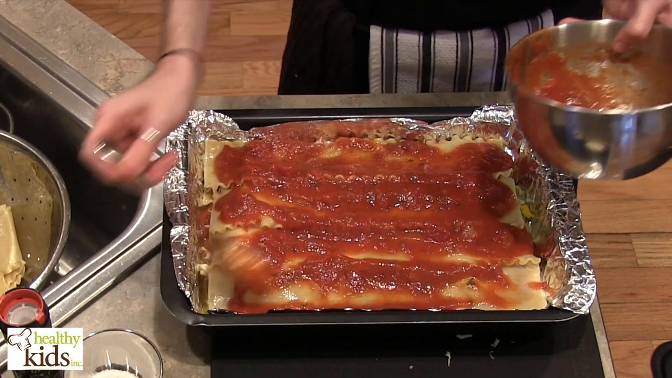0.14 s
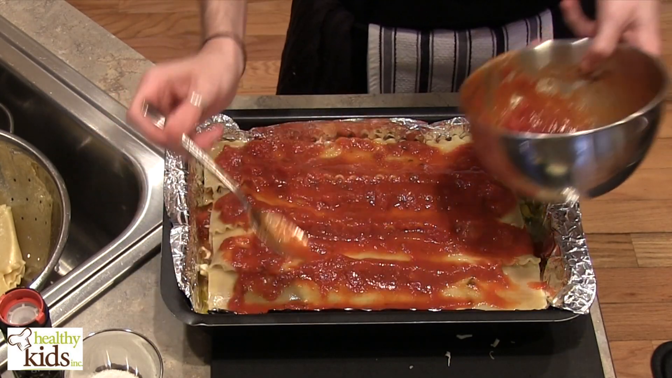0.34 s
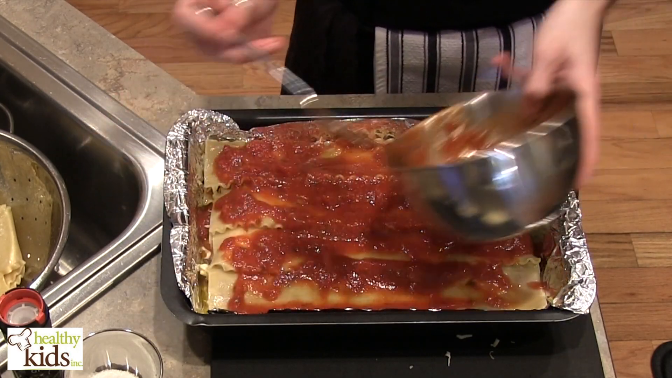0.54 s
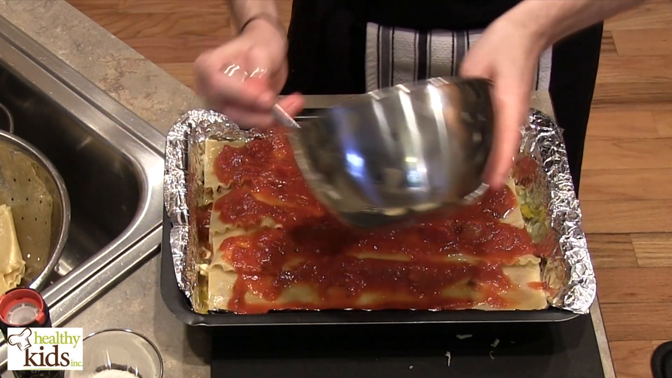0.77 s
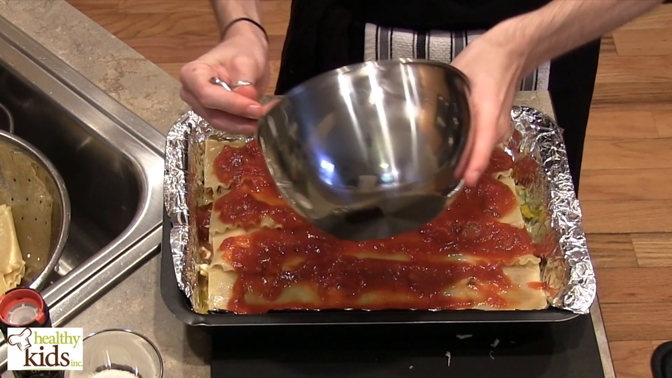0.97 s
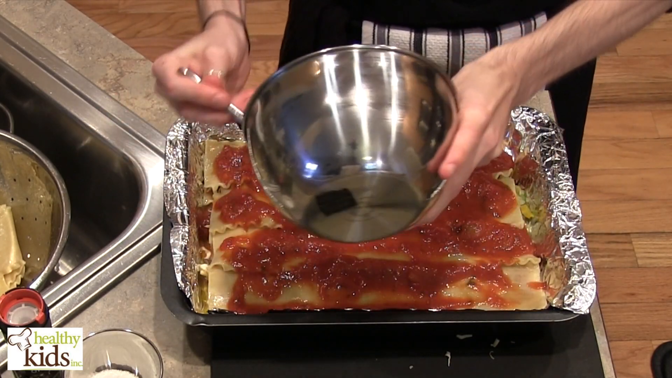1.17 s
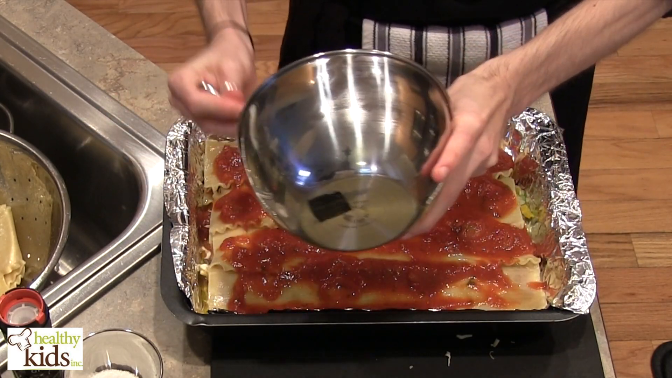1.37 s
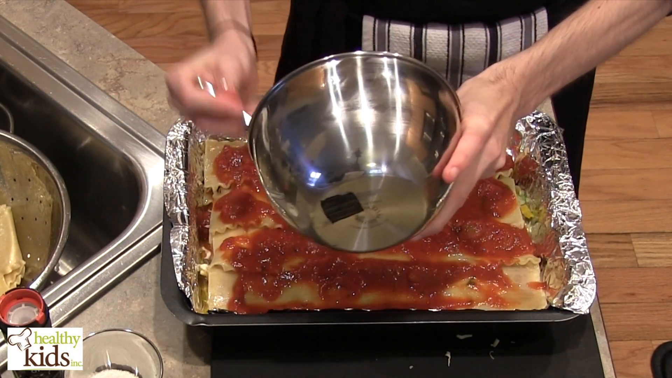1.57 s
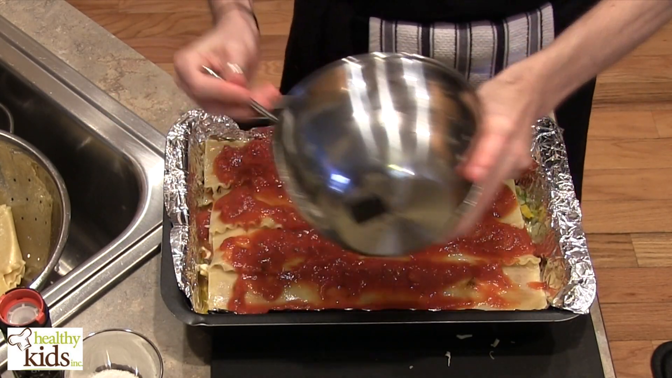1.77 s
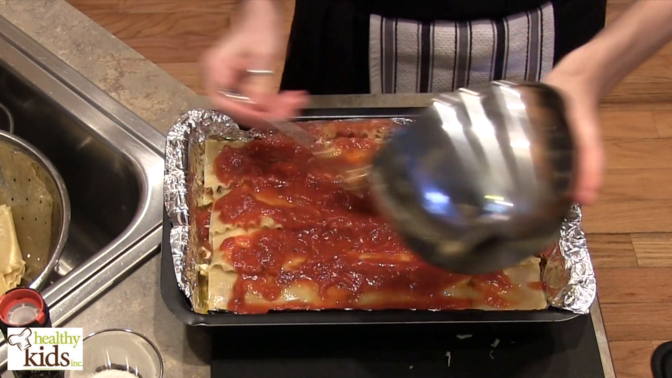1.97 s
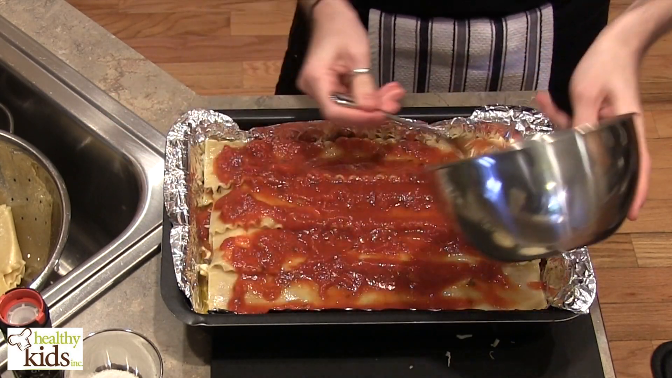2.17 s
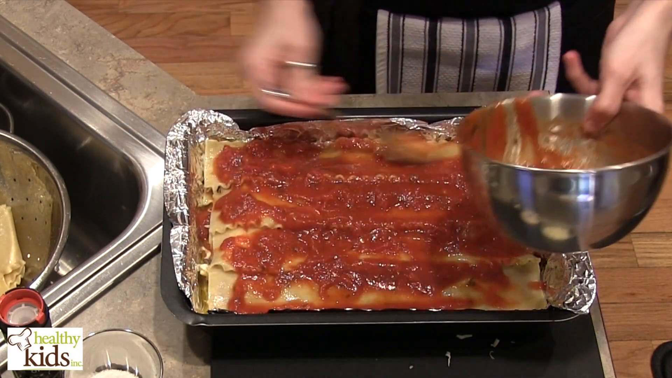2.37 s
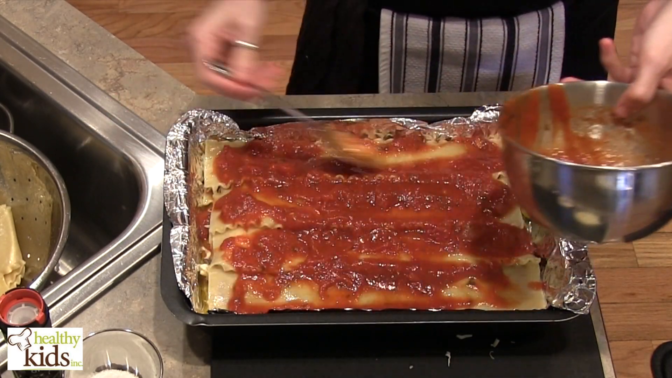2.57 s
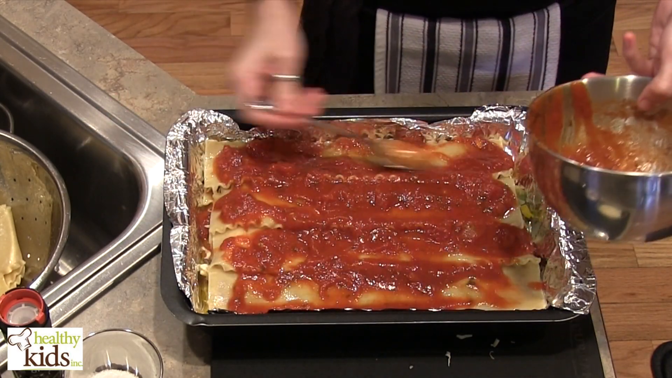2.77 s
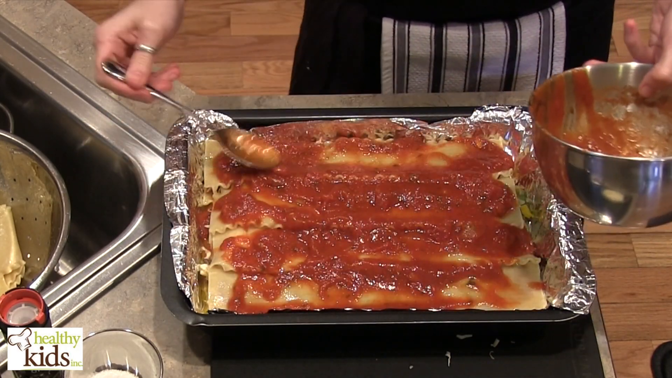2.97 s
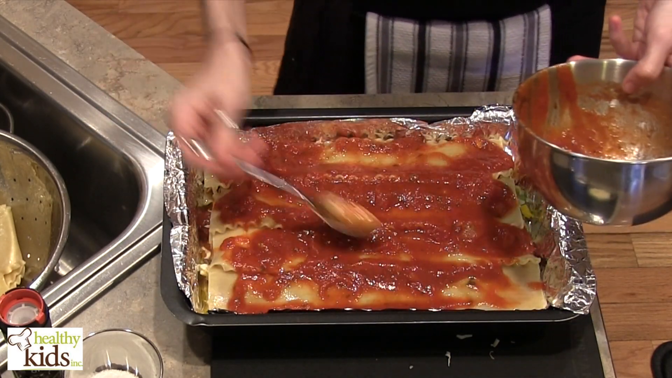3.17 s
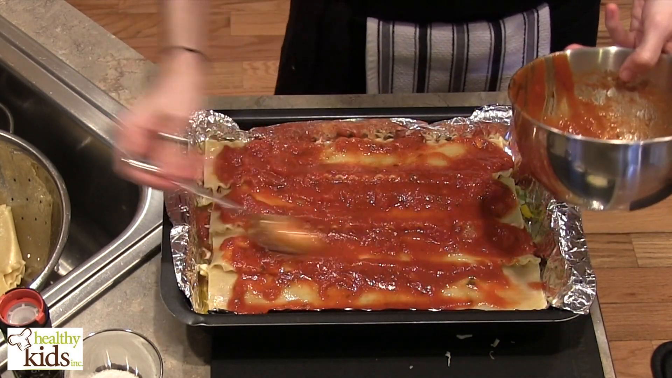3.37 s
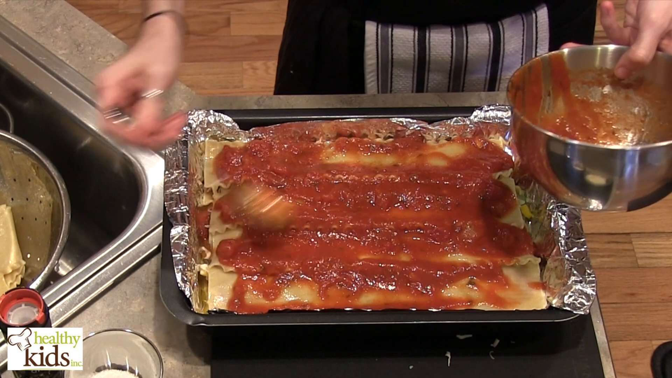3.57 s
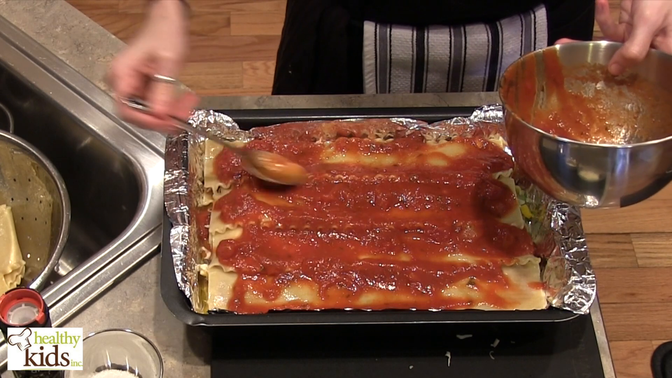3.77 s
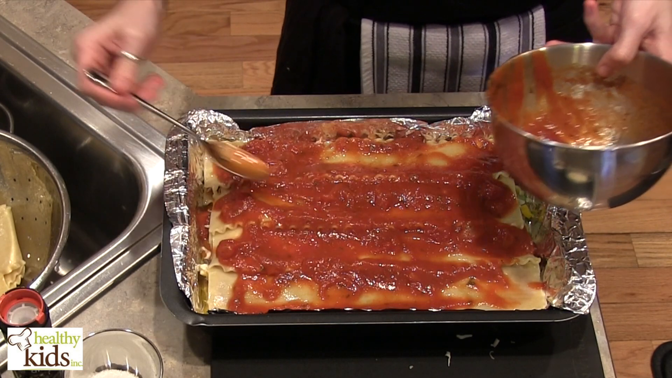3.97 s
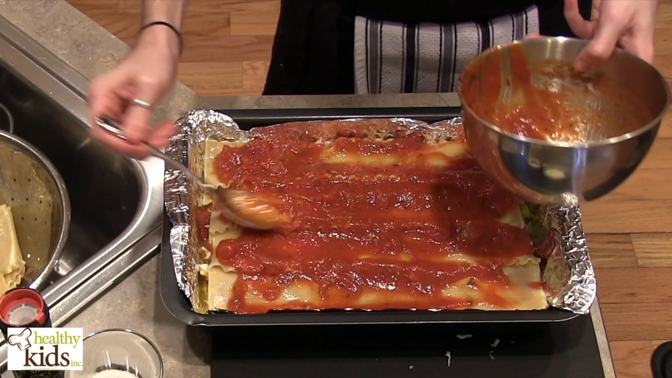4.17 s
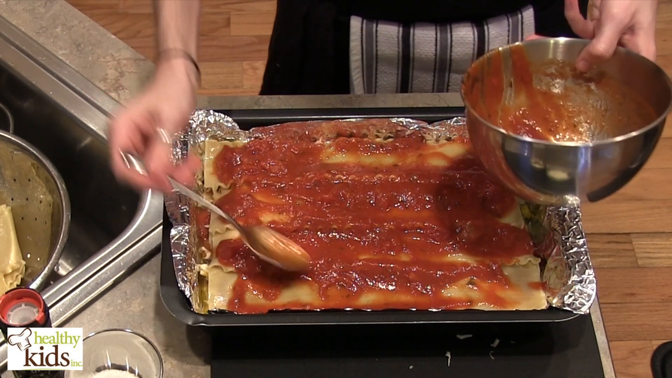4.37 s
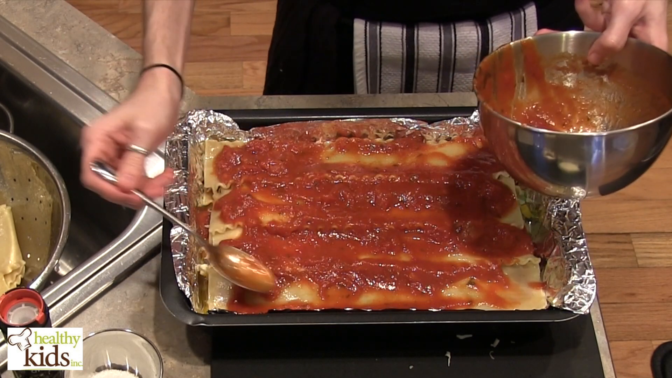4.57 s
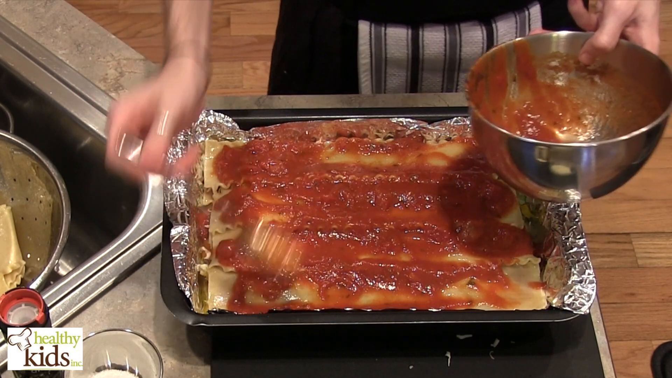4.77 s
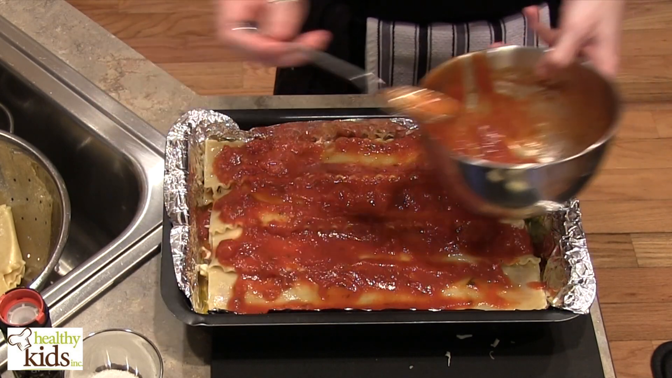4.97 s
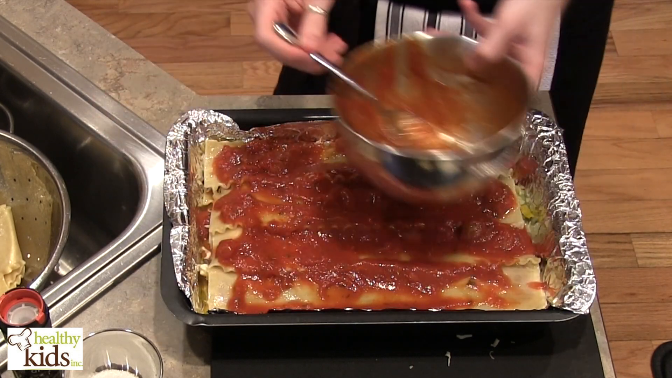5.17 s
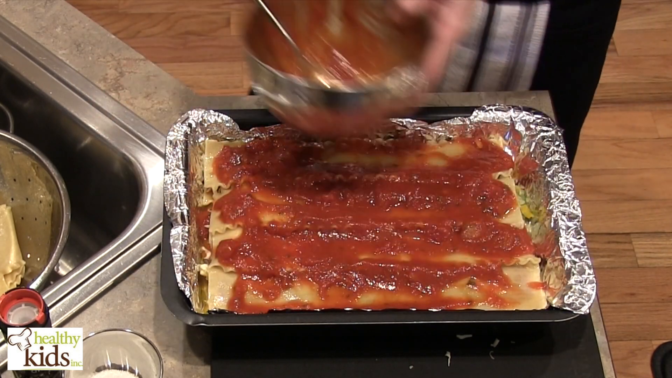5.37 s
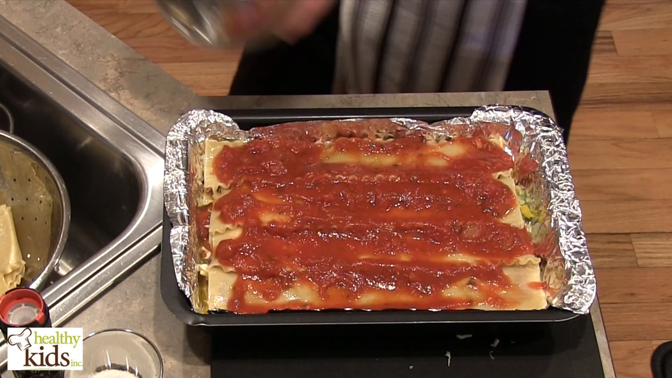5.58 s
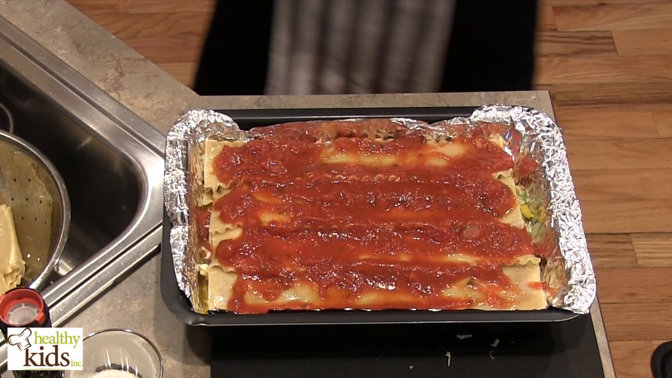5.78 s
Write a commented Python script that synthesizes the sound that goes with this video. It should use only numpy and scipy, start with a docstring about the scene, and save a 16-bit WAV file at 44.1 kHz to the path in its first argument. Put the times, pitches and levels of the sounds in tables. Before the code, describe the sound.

In a quiet small kitchen with faint hum and a distant ticking clock, a steel spoon strikes a hand-held mixing bowl in a quick clatter, scrapes along its wall and knocks it twice more. After small foil ticks and a sharp triple snap, a soft rustle leads to the spoon dropping into the bowl and rattling. Close stereo pickup, stronger on the left.

```python
"""Faint room noise and small ticks of a spoon in a foil-lined pan come first; a far clock ticks each second.
The steel spoon then clanks against a hand-held steel mixing bowl, and its edge scrapes out the sauce.
More ticks and a sharp triple snap at the foil follow; a soft rustle swells, and the spoon drops in and rattles.
Decaying sine waves make the bowl and spoon ring, tiny random slips make the scrapes, shaped noise the rest.
A small kitchen echoes bowl, spoon and pan."""
import sys
import numpy as np
from scipy import signal
from scipy.fft import rfft, irfft, next_fast_len
from scipy.io import wavfile

SR = 44100
rng = np.random.default_rng(int(sys.argv[2]) if len(sys.argv) > 2 else 0)


def wav_record(signal):
    """Record a signal, one row per channel, as 16-bit PCM in the file named by sys.argv[1]."""
    frames = np.transpose(np.atleast_2d(signal))
    bounded = np.clip(frames, -1, 1)
    # unit amplitude maps onto the largest positive 16-bit level
    quanta = np.round(bounded * 32767).astype(np.int16)
    wavfile.write(sys.argv[1], SR, quanta)


N = 257181  # length in samples


def amp(db):
    """Turns decibels into a gain."""
    return 10 ** (np.asarray(db) / 20)


def unit(x):
    """Scales a sound to an rms (average strength) of one."""
    return x / np.sqrt(np.mean(x ** 2) + 1e-20)


def read(points, hz):
    """Reads a value between rows of (Hz, value), on a log-frequency axis."""
    point_hz, value = np.transpose(points)
    return np.interp(np.log(hz + 1), np.log(point_hz + 1), value)


def add(mix, s, sound):
    """Mixes a sound in at a time in seconds, cut off at the end of the mix."""
    part = mix[max(round(s * SR), 0):][:len(sound)]
    part += sound[:len(part)]


def colour(x, spectrum):
    """Filters a sound by a spectrum, then scales it to an rms of one."""
    gain = amp(read(spectrum, np.fft.rfftfreq(len(x), 1 / SR)))
    return unit(irfft(rfft(x) * gain, len(x)))


def flat_noise(size):
    """Makes noise with all frequencies equally strong, at random phases."""
    phases = 2j * np.pi * rng.random(size // 2 + 1)
    return unit(irfft(np.exp(phases), size))


def band_noise(size, centre_hz, octaves):
    """Makes noise in a flat-topped band that reaches the given octaves to each side of its centre."""
    hz = np.geomspace(50, 20000, 60)
    distance = np.log2(hz / centre_hz) / octaves
    band = np.column_stack([hz, -10 * np.log10(1 + distance ** 6)])
    return colour(flat_noise(size), band)


def fade(t60):
    """Gives one second of exponential decay; t60 is the time in seconds to fall by 60 dB."""
    return np.exp(-np.log(1000) * np.arange(SR) / SR / max(t60, 1e-3))


def die_away(x, t60s, factor=1):
    """Lets each frequency band decay at its own speed."""
    hz, t, bands = signal.stft(x, SR, nperseg=256)
    decay_s = factor * read(t60s, hz)[:, None]
    return signal.istft(bands * amp(-60 * t / decay_s), SR, nperseg=256)[1][:len(x)]


# The colour of the room noise. Each row: frequency in Hz, relative level per Hz in dB.
ROOM_NOISE = [(15, -58), (25, -33.5), (43, -15.5), (108, -1), (172, -6.5), (202, 5), (232, -1), (368, 1),
              (854, -4), (952, -5.5), (2400, -8.5), (3320, -12), (8600, -19.5), (14400, -27),
              (16500, -40.5)]
# Steady low tones. Each row: frequency in Hz, rms level in dB before the microphone balance.
HUM_TONES = [(120, -84), (205, -85)]


def air(noise_db=-65, apart_db=-13, drone_hz=335, drone_db=-71):
    """Room noise and hum; a faint low drone fades out as the bowl is tipped."""
    t, size = np.arange(N) / SR, next_fast_len(N, True)
    shared, apart = (colour(rng.standard_normal(size), ROOM_NOISE)[:N] for _ in range(2))
    # the part that differs goes to left and right with opposite signs
    noise = amp(noise_db) * (shared + amp(apart_db) * apart * np.array([[1], [-1]]))
    hum = sum(amp(db) * np.sqrt(2) * np.sin(2 * np.pi * hz * t) for hz, db in HUM_TONES)
    band = [(drone_hz / 2, -50), (drone_hz * 0.83, -14), (drone_hz, 0), (drone_hz * 1.15, -12),
            (drone_hz * 2, -50)]
    drone = amp(drone_db) * colour(rng.standard_normal(size), band)[:N]
    return noise + hum + drone * np.interp(t, [.7, 1.1], [1, 0])


# Small ticks of spoon, foil and sauce. Each row: start in seconds, level in dB, centre frequency in Hz.
PAN_TICKS = [(.02, -66, 7300), (.045, -64, 4000), (2.38, -67.5, 7450), (2.579, -68, 6950),
             (3.374, -52.5, 1520), (3.426, -59, 8400), (5.241, -63.5, 4540), (5.282, -55.5, 5000)]


def pan_ticks(octaves=0.35, t60=0.052):
    """Short dead ticks in the sauce: narrow bands of noise that die at once."""
    out = np.zeros(N)
    for s, db, centre_hz in PAN_TICKS:
        add(out, s, amp(db) * band_noise(SR, centre_hz, octaves) * fade(t60))
    return out


# How long the kitchen echoes. Each row: frequency in Hz, time to fall by 60 dB in seconds.
KITCHEN_T60 = [(150, 0.34), (660, 0.51), (1740, 0.5), (4600, .43), (8000, 0.37), (12000, 0.25),
               (16000, 0.25)]


def kitchen(x, echoes_per_s=4000, apart_db=-9.0, build_s=0.002):
    """Dense wall echoes, treble and bass dying at their own speeds, partly alike at two close microphones."""
    t = np.arange(SR) / SR
    echoes = rng.choice([-1., 1.], (2, SR)) * (rng.random((2, SR)) < echoes_per_s / SR)
    echoes *= 1 - np.exp(-t / build_s)
    shared, apart = (die_away(row, KITCHEN_T60) for row in echoes)
    tails = (shared + amp(apart_db) * apart * np.array([[1], [-1]])) / np.linalg.norm(shared)
    return signal.fftconvolve(x[None], tails, axes=1)[:, :N]


# The colour of a clock tick. Each row: frequency in Hz, relative level per Hz in dB.
CLOCK_COLOUR = [(900, -20.5), (1800, -2), (2150, -6.5), (2350, 4.5), (2600, 4.5), (2850, -13),
                (6000, -22.5), (10000, -43.5)]


def clock(first_s=.795, db=-56, rise_s=0.013, t60=0.35):
    """A noise tick every second from across the room, its onset blurred by the walls."""
    out = np.zeros(N)
    swell = 1 - np.exp(-np.arange(SR) / SR / rise_s)
    for s in np.arange(first_s, N / SR, 1):
        add(out, s, amp(db) * colour(flat_noise(SR), CLOCK_COLOUR) * swell * fade(t60))
    return out


def treble_share(hz):
    """How far the hardness of a blow acts on a frequency, from 0 to 1."""
    return hz ** 2 / (hz ** 2 + 3000 ** 2)


def clustered_modes():
    """One second of dense steel modes; in the treble they bunch in clusters that differ with every contact."""
    hz, knots = np.fft.rfftfreq(SR, 1 / SR), np.arange(0, SR / 2, 170)
    clusters_db = 5 * np.interp(hz, knots, np.clip(rng.standard_normal(len(knots)), -2, 2))
    return irfft(rfft(flat_noise(SR)) * amp(clusters_db * np.sqrt(treble_share(hz))), SR)


def thin_shell(x, cut_hz):
    """A small thin shell radiates hardly any bass."""
    return signal.sosfilt(signal.butter(N=3, Wn=cut_hz, btype="high", fs=SR, output="sos"), x)


PLACES = ("rim", "wall", "bottom")
# The bowl's clear modes (its own tones), before grip and sauce act on them.
# Each row: frequency in Hz, time to fall by 60 dB in seconds,
# then relative level in dB for a blow on the rim, on the wall and on the bottom.
RING_MODES = [ (680, 0.28, -2.5, -14.5, -4.5), (710, 0.39, -10, -16, -7.5), (819.4, 0.7, 2.5, -45, -4.5),
              (846, 0.32, -7, -10, -0.5), (870, 0.35, -15.5, 0, -3), (906.3, 0.2, -2, -29, -7),
              (1188, 0.24, -9.5, -25, -13), (1210, 0.26, -12, -35.5, -3.5), (1271, 0.55, -11, -25.5, -11.5),
              (1539, .4, -8.5, -38.5, -21), (1535, 0.35, -22.5, -22, -20), (1598, 0.53, -19.5, -31.5, -14),
              (1680, .35, -22.5, -32, -4), (1697, 0.4, -10.5, -15, -32), (1810, 0.99, -20.5, -23.5, -18.5),
              (2360, 0.43, -7.5, -22, -16), (2479, 0.33, -19.5, -24.5, -13.5), (2974, 0.2, -17, -21.5, -20),
              (3085, 0.51, -12.5, -28.5, -12.5), (3200, 0.19, -25, -22, -23),
              (3785, 0.099, -3.5, -35.5, -17), (4236, 0.27, -20.5, -26, -12),
              (4190, 0.39, -24.5, -28.5, -13), (5544, .28, -32, -28.5, -27),
              (6030, 0.298, -26.5, -25, -17.5), (6570, 0.21, -10, -25, -46), (7750, 0.33, -28, -23, -15),
              (8000, .33, -13.5, -16, -37), (8580, 0.22, -19.5, -13.5, -21)]


def bowl_ring(place, treble_db, hold, cents):
    """The clear modes; the place of contact sets how hard each is driven, the grip damps and detunes them."""
    t = np.arange(SR) / SR
    hz, t60, *place_db = np.transpose(RING_MODES)
    hz = hz * 2 ** (cents / 1200)
    # hand and sauce let no mode ring long
    t60 = np.minimum(hold * t60, np.interp(hz, [2600, 6000], [.5, .3]))
    level_db = place_db[PLACES.index(place)] + treble_db * treble_share(hz)
    size = amp(level_db) * rng.choice([-1, 1], len(hz))
    decay = np.exp(-np.log(1000) * t / t60[:, None])
    return size @ (np.sin(2 * np.pi * hz[:, None] * t) * decay)


# The thicket of weak modes between the clear ones.
# Each row: frequency in Hz, then relative level in dB for a blow on the rim, on the wall and on the bottom.
WEAK_MODES = [(148.8, -43, -26, -16), (510, -30.5, -17.5, -50), (617, -15.5, -12, -23.5), (710, 0, -2, 3),
              (970, -3.5, -19.5, -5.5), (1350, -13, -17, -12.5), (1670, -7, -2.5, -5.5),
              (1980, -22, -21, -17), (3105, -17.5, -26, -16), (4970, -18, -28.5, -17.5),
              (5340, -22.5, -37, -25), (6560, -18.5, -18.5, -31), (8365, -17, -13.5, -17.5),
              (16000, -43.5, -41, -45)]
# How long the thicket sounds, before the grip. Each row: frequency in Hz, time to fall by 60 dB in seconds.
WEAK_MODES_T60 = [(250, 0.26), (800, 0.16), (3000, 0.3), (8000, 0.21), (15000, .16)]
# The spoon strikes the bowl. Each row: start in seconds, place, ring level in dB, clatter level in dB,
# crack level in dB, extra treble in dB, factor on the decay times of ring and clatter.
BLOWS = [ (.8874, "rim", -24, -19, -20.5, -2.5, 0.82), (.903, "rim", -30, -29, -29, 7.5, 0.8),
         (.924, "rim", -35, -22, -30, -5.5, 1.03), (.972, "rim", -44, -26.5, -42, 0.5, 1),
         (1.0217, "wall", -15, -26, -31, -1, 0.9), (1.4182, "wall", -21.5, -25, -28.5, 2.5, .82),
         (1.7621, "wall", -31.5, -31.5, -29.5, -2, 0.82), (5.3708, "bottom", -22, -19.5, -21.5, 4, 0.71),
         (5.428, "bottom", -34, -31, -54, -9, 1.42), (5.441, "bottom", -29, -24.5, -54, -10, 0.57),
         (5.535, "bottom", -44, -37.5, -48, -10.5, 1.76), (5.6626, "bottom", -25.5, -23.5, -44, 0, 0.9),
         (5.686, "bottom", -32, -27.5, -37, 9.5, 0.44), (5.707, "wall", -20.5, -43, -41, -10.5, .72)]
# the grip tightens as the bowl is carried off and pulls its modes sharp
REGRIP_S, REGRIP_CENTS = 5.6, 21.6


def clanks(crack_t60=0.038, bass_cut_hz=360, thud_db=-39, thud_hz=65, jolt_db=-24):
    """Each blow gives a clear ring, and a clatter of dense modes that opens with a crack."""
    ring, clatter, thuds = np.zeros((3, N))
    hz, *weak_db = np.transpose(WEAK_MODES)
    thud = np.sin(2 * np.pi * thud_hz * np.arange(SR) / SR) * fade(.06)
    for s, place, ring_db, clatter_db, crack_db, treble_db, hold in BLOWS:
        cents = REGRIP_CENTS * (s > REGRIP_S)
        add(ring, s, amp(ring_db) * bowl_ring(place, treble_db, hold, cents))
        level_db = weak_db[PLACES.index(place)] + treble_db * treble_share(hz)
        spectrum = np.column_stack([hz, level_db])
        rattle = die_away(colour(clustered_modes(), spectrum), WEAK_MODES_T60, hold)
        add(clatter, s, amp(clatter_db) * rattle)
        crack = colour(clustered_modes(), spectrum) * fade(crack_t60)
        add(clatter, s, amp(crack_db) * crack)
        if crack_db > jolt_db:  # only the hardest blows jolt the whole bowl
            add(thuds, s, amp(ring_db + thud_db) * thud)  # thud level is relative to the ring
    return thin_shell(ring, bass_cut_hz), thin_shell(clatter, bass_cut_hz) + thuds


# The spoon's own handle pings. Each row: start in seconds, frequency in Hz, level in dB,
# time to fall by 60 dB in seconds.
HANDLE_PINGS = [(.889, 4160, -22, .28), (.889, 5466, -28, .28), (1.022, 4228, -33, .48),
                (5.372, 4753, -25, .2), (5.678, 4792, -26.5, .35)]


def spoon(rise_s=0.0027):
    """High bending modes of the handle; the fingers shift their pitch a little."""
    out, t = np.zeros(N), np.arange(SR) / SR
    for s, hz, db, t60 in HANDLE_PINGS:
        rise = 1 - np.exp(-t / rise_s)
        add(out, s, amp(db) * np.sin(2 * np.pi * hz * t) * rise * fade(t60))
    return out


def stroke_pressure(start, leave, drag_db, lip_db, land_s=.005, swell_s=0.023, release_s=0.014):
    """How hard the edge presses in one stroke: an even drag, a swell towards the lip, a quick release."""
    t = np.arange(N) / SR
    landing = np.clip((t - start) / land_s, 0, 1)
    near_lip = np.exp(-np.maximum(leave - t, 0) / swell_s)
    release = np.exp(-np.maximum(t - leave, 0) / release_s)
    return landing * amp(drag_db + (lip_db - drag_db) * near_lip) * release


# Scraping strokes. Each row: start in seconds, time of leaving the wall in seconds,
# level of the even drag in dB, level at the lip in dB.
SCRAPE_STROKES = [ (.935, 1.17, -39.5, -34), (1.43, 1.527, -37, -35.5), (1.764, 1.855, -41, -29.5),
                  (5.437, 5.557, -61, -51.5), (5.636, 5.688, -58, -39)]
# The colour of the scraping edge. Each row: frequency in Hz, relative level per Hz in dB.
SCRAPE_COLOUR = [(60, -55), (300, -35.5), (800, -11), (1700, -4.5), (2400, -10.5), (3400, -6),
                 (4300, -12.5), (5400, -17.5), (6500, -6), (8500, 5.5), (10500, -3.5), (13500, -7),
                 (16500, -28.5)]


def scrapes(slips_per_s=1800, spread_db=3, slip_t60=0.024, sing_db=-13, sing_treble_db=22,
            bass_cut_hz=250, spots=3):
    """The edge sticks and slips; each slip briefly rings one of a few spots, and the wall sings along."""
    slips = (rng.random(N) < slips_per_s / SR) * rng.choice([-1, 1], N)
    slips = slips * amp(spread_db * np.minimum(rng.exponential(1, N), 4))  # some slips are stronger
    pressure = sum(stroke_pressure(*stroke) for stroke in SCRAPE_STROKES)
    drive, spot = unit(slips) * pressure, rng.integers(0, spots, N)
    wall = np.diff(bowl_ring("wall", sing_treble_db, 0.99, 0))  # the difference favours the treble
    out = amp(sing_db) * signal.oaconvolve(drive, wall / np.linalg.norm(wall))[:N]
    for k in range(spots):
        steel = colour(clustered_modes(), SCRAPE_COLOUR) * fade(slip_t60)
        out += signal.oaconvolve(drive * (spot == k), steel / np.linalg.norm(steel))[:N]
    return thin_shell(out, bass_cut_hz)


# The spoon snaps against the pan's foil edge. Each row: start in seconds, level in dB,
# time to fall by 60 dB in seconds.
FOIL_SNAPS = [(2.7339, -40, 0.058), (2.7385, -35, 0.056), (2.742, -33.5, 0.041)]
# The colour of the foil. Each row: frequency in Hz, relative level per Hz in dB.
FOIL_COLOUR = [(88, -52), (150, -40), (361, -12), (422, -1.5), (675, -5), (790, -15), (888, -11),
               (2360, 0.5), (2920, -6.5), (5250, -6), (5680, -13), (6640, -1), (11500, -9), (12700, -7),
               (16000, -30)]


def foil_snaps():
    """One sharp triple snap at the foil: three quick bursts of noise in the foil's colour."""
    out = np.zeros(N)
    for s, db, t60 in FOIL_SNAPS:
        add(out, s, amp(db) * colour(flat_noise(SR), FOIL_COLOUR) * fade(t60))
    return out


# A soft rustle. One row: start in seconds, end in seconds, level at the start in dB, level at the end in dB.
BOWL_RUSTLE = (5.148, 5.37, -66, -61)


def rustle(centre_hz=1430, octaves=1.05):
    """A band of noise that swells while the bowl is drawn in."""
    out = np.zeros(N)
    start, end, start_db, end_db = BOWL_RUSTLE
    swell = amp(np.linspace(start_db, end_db, round((end - start) * SR)))
    add(out, start, swell * band_noise(SR, centre_hz, octaves)[:len(swell)])
    return out


def scene(ring_room_db=-11, clatter_room_db=-7, scrape_room_db=-5, pan_room_db=-3):
    """Mixes all sources; bowl, spoon and pan each send their share to the kitchen echo."""
    bowl, clatter = clanks()
    ring, scrape = bowl + spoon(), scrapes()
    pan = pan_ticks() + foil_snaps() + rustle()
    sent = amp(ring_room_db) * ring + amp(clatter_room_db) * clatter
    sent += amp(scrape_room_db) * scrape + amp(pan_room_db) * pan
    return ring + clatter + scrape + pan + clock() + kitchen(sent) + air()


def record(dry, edge_hz=16750):
    """The left microphone is the more sensitive; a low-pass then removes the highest treble."""
    balance = amp([[2.3], [-5.2]])  # left, right in dB
    low_pass = signal.firwin(301, edge_hz, window=("kaiser", 9), fs=SR)
    return signal.oaconvolve(dry * balance, low_pass[None], "same", axes=1)


dry = scene()
out = record(dry)
wav_record(out)
```